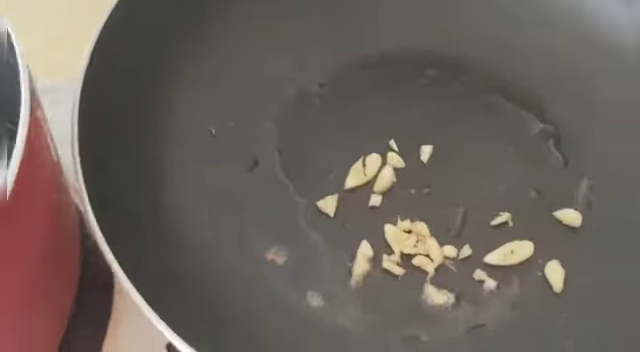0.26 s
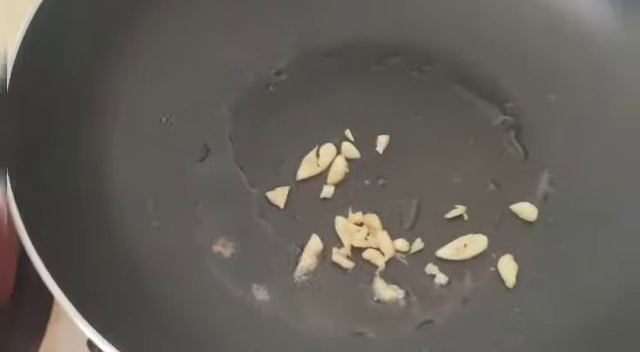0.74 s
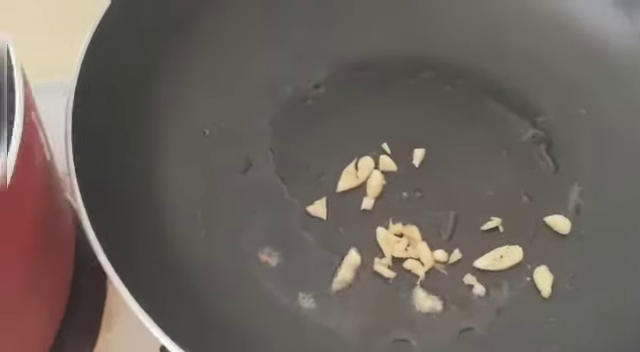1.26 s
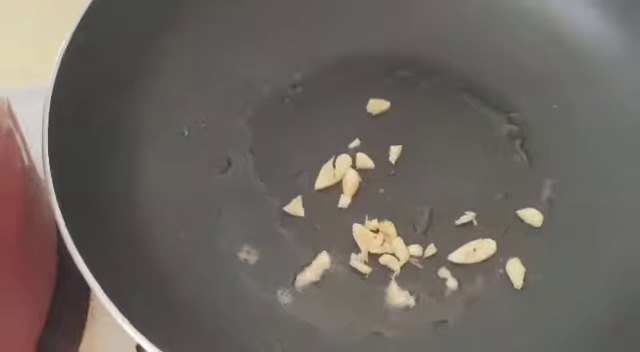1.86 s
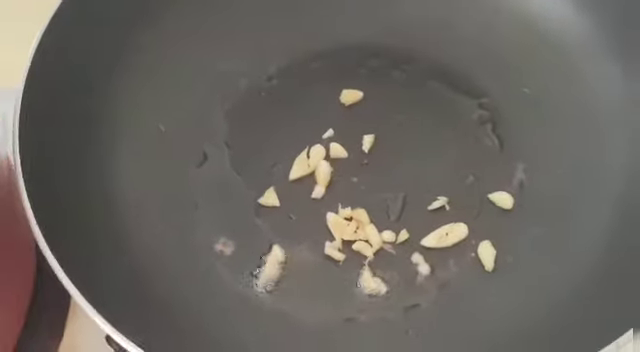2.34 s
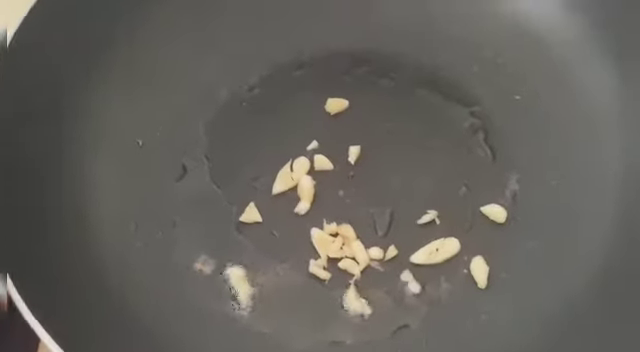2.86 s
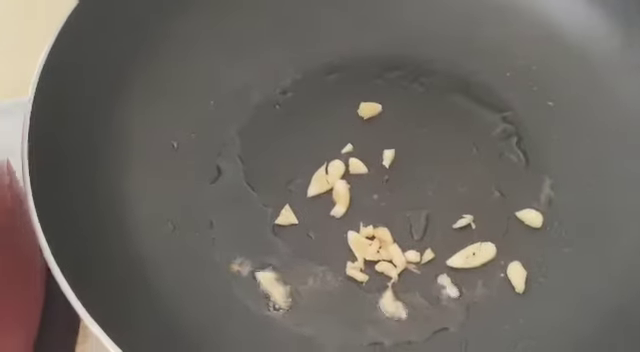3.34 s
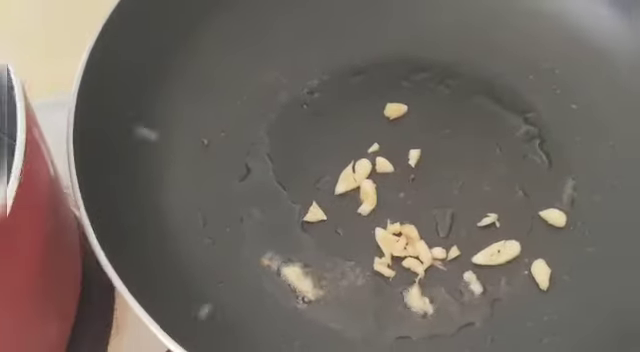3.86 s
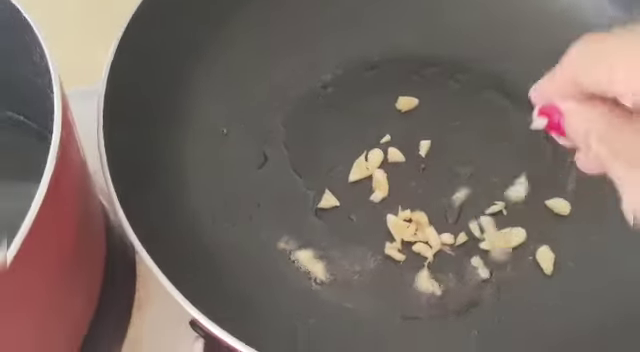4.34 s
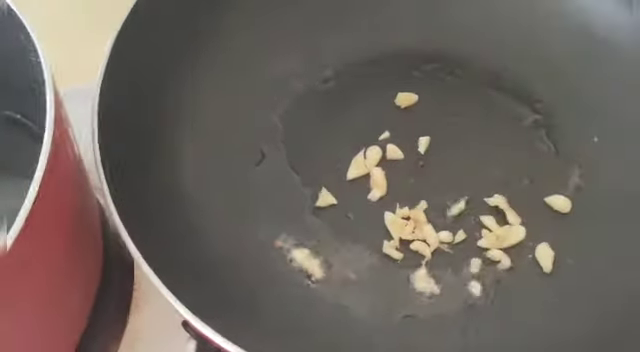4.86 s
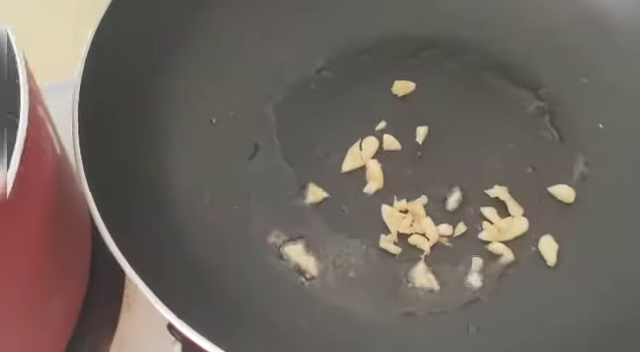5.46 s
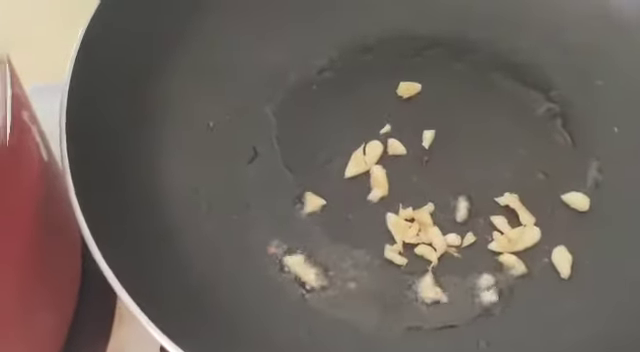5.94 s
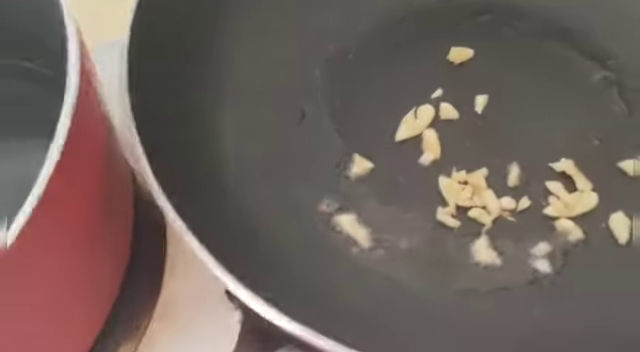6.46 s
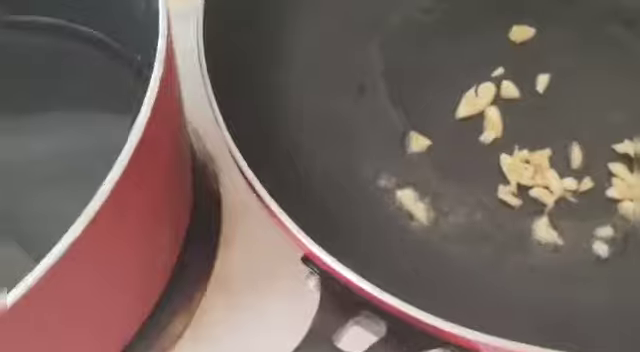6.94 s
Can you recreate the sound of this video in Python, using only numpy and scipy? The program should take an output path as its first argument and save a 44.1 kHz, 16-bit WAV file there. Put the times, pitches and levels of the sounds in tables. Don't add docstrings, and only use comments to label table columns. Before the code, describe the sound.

A steady, fine sizzle of garlic in hot oil fills about 7 seconds, thin and bright, strongest around 8 kHz, over quiet room rumble and burner and fridge hum. A faint handling thud opens it; the first second and a half is mostly even hiss with small chirping bubbles. At 1.5 s a piece lands with a soft, dull knock and tiny bounces; a pop snaps at 1.9 s. From 2.7 to 3.3 s squeaky bubbles and crisp pops cluster. A lower, spattering pop comes at 3.8 s, more crackles at 4.15-4.25 s, and two close knocks at 4.4 s. The sizzle rises slightly near 4.8 s. Strong sharp pops hit at 5.15, 5.4 and 5.7 s, a lesser one with a faint bump at 6.2 s, and another strong pop at 7.0 s. Close, stereo, handheld phone, with slightly watery noise-reduced treble.

```python
import sys
import numpy as np
from scipy import signal
from scipy.io import wavfile
from scipy.ndimage import uniform_filter1d, minimum_filter1d

SR = 44100
rng = np.random.default_rng(int(sys.argv[2]) if len(sys.argv) > 2 else 0)


def output_pcm(signal):
    pcm = np.clip(np.atleast_2d(signal).T, -1, 1) * 32767
    wavfile.write(sys.argv[1], SR, np.round(pcm).astype(np.int16))


def voltage_ratio(level):
    return 10 ** (np.asarray(level, float) / 20)


N = 317079
STEP = 40

# frequency in Hz, level in dB per Hz.
ROOM_SPECTRUM = [(12, -30), (20, -9), (31, -20), (49, -12.5), (156, -12.5), (558, -17), (738, -18),
                 (917, -20.5), (1190, -4.5), (1410, -21), (2000, -17), (2420, -18), (3500, -28.5),
                 (4550, -96), (7700, -120)]
# frequency in Hz, width in Hz, level in dB.
HUMS = [
    (78.6, 4.3, -69),
    (142.6, 6.7, -65),
    (690, 170, -73),
]
# start in seconds, peak in dB.
BUMPS = [
    (0.02, -47),
    (0.471, -49),
    (6.219, -45),
]
# start in seconds, peak in dB, pitch in Hz.
KNOCKS = [
    (1.287, -40, 667),
    (1.5068, -27, 730),
    (1.528, -40, 775),
    (1.545, -40, 790),
    (2.015, -51, 785),
    (4.3975, -34.5, 790),
    (4.431, -34, 780),
    (4.749, -46, 690),
]
# start in seconds, peak in dB, left-right in dB.
SNAPS = [(1.5025, -30, -6), (1.8645, -31, -6), (2.8489, -23, -4.0), (3.0579, -16, -1.5), (3.8113, -20, -8),
         (4.15, -16, -8), (4.2015, -23, -2.5), (4.4095, -24, -2), (5.9025, -38, 15), (6.1325, -20.5, -11),
         (6.2219, -16, -5.5), (6.5316, -26, -8.5), (6.9971, -17, -8), (7.0645, -19, -8.0)]
# start in seconds, level in dB, pitch in Hz, left-right in dB.
BLIPS = [(0.7423, -27, 8000, -1.8), (1.8728, -32, 8610, 0.1), (1.8664, -35, 7700, 0),
         (1.8714, -31, 7900, 0), (1.8795, -30, 7300, 0), (1.8895, -44, 8250, 0), (4.2297, -30.5, 4380, 0),
         (4.3965, -33, 1270, 6), (3.8125, -27, 7200, 0), (3.8258, -33, 4480, 0), (3.8122, -29, 3000, -2),
         (2.6599, -27, 7760, -2.0), (2.6796, -24, 8070, 2), (2.7443, -25, 8000, -0.3),
         (2.7813, -22, 6930, 1.7), (2.8367, -26, 6930, -1.5), (3.4817, -37, 7730, -20),
         (3.6746, -31, 8660, -2.5), (3.6821, -31.5, 7950, -4.7), (3.6874, -27, 8070, -1.4),
         (4.0297, -31, 9240, -7), (4.2349, -24, 4330, -3.6), (4.2399, -34, 4570, 1),
         (4.2482, -35, 4360, -3.2), (4.575, -33, 5400, 3), (4.768, -26, 7060, 2), (4.9856, -28, 8230, -8),
         (5.1675, -29.0, 8460, -2.7), (5.617, -30.1, 8050, -1.1), (5.7332, -28.0, 8200, -3.9),
         (5.7397, -26, 8300, -1.4), (5.7443, -24.5, 4220, -5), (5.8649, -39, 8600, -3.0),
         (6.11, -25, 8500, -0.9), (6.2123, -30.5, 8290, 3), (6.2289, -30.9, 8050, 4.2),
         (6.4148, -27, 7400, -9), (7.0309, -26.2, 8100, -3.3), (7.031, -31, 4400, 0),
         (4.2128, -29, 4400, 2), (5.4575, -27, 8000, 0), (5.4615, -28, 8050, 0), (5.4645, -27, 8100, 0)]
# start in seconds, level in dB, pitch in Hz.
MIDDLE_BLIPS = [(0.249, -27, 8700), (0.304, -26, 7860), (0.7497, -31, 7760), (0.8544, -31, 8180),
                (0.9517, -29, 8100), (1.1299, -29, 8050), (1.1438, -34, 7900), (1.5033, -29, 8700),
                (1.5948, -31, 7970), (1.6123, -31, 8290), (1.6177, -30, 7900), (1.7625, -26.5, 5800),
                (1.8262, -31, 8290), (2.0193, -35, 7800), (2.4364, -58, 8060), (2.7016, -26, 8230),
                (2.7495, -26, 8100), (2.766, -30, 7840), (2.7714, -28, 6750), (2.8522, -29, 7900),
                (2.8567, -26, 8050), (3.3307, -31, 7200), (3.3371, -30, 8310), (3.3506, -26, 8500),
                (3.4882, -30, 7430), (3.6688, -30, 7600), (3.8478, -36, 7880), (3.9052, -43, 8200),
                (4.0381, -31, 7390), (4.135, -32, 7450), (4.4322, -36, 10030), (4.4401, -31, 9900),
                (4.8186, -32, 7500), (4.9917, -31, 8400), (5.0015, -26.5, 6800), (5.0778, -33, 7600),
                (5.135, -33, 8570), (5.2881, -27, 7700), (5.299, -29, 7700), (5.3159, -30, 5200),
                (5.4531, -23, 7820), (5.5196, -29, 7150), (5.5719, -26, 7210), (5.5959, -31, 8200),
                (5.6007, -28, 7990), (5.7006, -31, 7800), (5.7083, -31, 8760), (5.7142, -26, 8720),
                (5.7191, -30, 8040), (5.7256, -31, 7970), (5.8256, -27, 8320), (5.9044, -34, 7080),
                (6.0458, -50, 9070), (6.0663, -24, 8850), (6.1171, -32, 8510), (6.3557, -30, 7300),
                (6.3641, -34, 7600), (6.6183, -31, 7920), (6.7983, -30, 7920), (6.9141, -32, 7990)]
# start in seconds, peak in dB, pitch in Hz, left-right in dB.
SQUEALS = [(0.7494, -26.5, 8000, 2), (2.682, -29.5, 7040, 0), (2.748, -25, 7700, 0), (2.765, -29, 7000, 2),
           (2.828, -24.5, 6900, 0), (2.849, -31, 8200, 0), (1.82, -29, 8300, -3), (3.672, -27, 8460, 2),
           (3.845, -30, 7340, -1), (4.025, -35, 9500, -9), (4.572, -29, 5300, 3), (5.16, -26, 8300, 0),
           (5.3094, -29, 5550, 1), (5.455, -19, 8070, 0), (5.698, -32, 7940, 0), (5.702, -29, 6000, -3),
           (5.724, -24, 6800, 0), (5.5179, -30, 7160, -2.0), (7.028, -30, 6000, -3.5),
           (7.0294, -28, 8060, 4), (7.055, -26, 6800, 0), (7.036, -31, 8200, 0), (2.752, -32, 8200, 0),
           (2.962, -28, 7900, 0), (3.003, -25, 7950, 0), (2.875, -29, 7500, 0)]
# start in seconds, peak in dB, pitch in Hz, left-right in dB.
SPATTERS = [(1.735, -33, 5870, -2), (1.866, -27, 8200, -3), (3.809, -30, 3130, -2), (3.815, -33, 4500, -4),
            (4.21, -28.5, 3760, 3), (4.224, -28.5, 4470, -5), (4.245, -39, 4200, 2), (4.235, -31, 6000, 0),
            (4.262, -34, 3870, 0), (5.705, -36, 5070, -5), (5.735, -32, 4350, -2.5), (7.026, -34, 4450, 0)]
# start in seconds, peak in dB, pitch in Hz, relative lows in dB, left-right in dB.
POPS = [(1.8635, -16.5, 8640, -17.5, 4), (2.4903, -35.5, 8200, -1.5, 0), (2.867, -23, 7400, -26, 2),
        (2.96, -17, 8300, -38, -0.5), (2.995, -22, 7800, -17, -1.5), (3.0568, -16, 8700, -24, -2),
        (3.3248, -18.5, 7460, -41, 1), (3.8098, -17, 2770, -15.5, 7), (4.15, -24.5, 7460, -17, 5),
        (4.2008, -18, 7800, -26, 3), (4.2263, -17, 4270, -30, 9), (4.4087, -30.5, 8400, -7, -4),
        (5.1433, -11.5, 7940, -21.5, 1), (5.19, -19.5, 7570, -22, 2), (5.263, -35, 8100, -6.5, -2),
        (5.4016, -13.5, 6850, -47, -7), (5.5586, -19, 7500, -34, 1), (0.2427, -25, 8300, -30, 14),
        (5.6908, -11.5, 7450, -19.5, -1), (5.949, -26, 3600, -14, 5), (6.221, -20, 7900, -16, 6),
        (6.996, -12.5, 7800, -15.5, 0.5), (7.064, -27, 6700, -26, -3.5), (7.114, -28, 6870, -16.5, -3),
        (1.5015, -33, 8600, -5.5, 0)]
# lag in seconds, level in dB.
PAN_ECHOES = [(.0009, -11), (.0017, -11), (.0026, -13), (.0038, -16)]
# relative lows in dB, lower edge in Hz.
LOWS_REACH = [(-18, 2700), (-15, 750)]
# frequency in Hz, level in dB per Hz.
FIZZ_SPECTRUM = [(1180, -39), (2000, -20), (2400, -19.5), (3020, -12), (4450, -9), (4890, -8), (5810, -5),
                 (7070, 0.5), (8050, 3.5), (9000, -0.5), (11300, -6.5), (13100, -9), (15100, -4.5),
                 (15600, -12)]
# time in seconds, level in dB.
VIGOUR = [(0.0, -35.5), (0.58, -38.5), (0.9, -38), (1.2, -39), (1.58, -39), (2.3, -39), (2.68, -38),
          (2.88, -38.5), (3.04, -36), (3.36, -40.5), (4.14, -41), (4.46, -40.5), (4.83, -36.5), (5.29, -37),
          (5.6, -38.5), (6.27, -37.5), (6.57, -36.5), (7.19, -39)]
# time in seconds, treble in dB, lows in dB, left-right in dB.
AIM = [
    (0.0, 4, 4.5, -3),
    (1.2, 3, 2.4, -1),
    (2.8, 2.1, 1, -1),
    (4.2, -1.5, 0.5, -1.8),
    (5.3, 0, 3.5, -1.5),
    (7.19, 0.9, 2, -3.5),
]
# frequency in Hz, width in Hz, gain in dB.
WALL_NOTCHES = [(4480, 130, 2.5), (4950, 300, -3), (6270, 260, -2.2), (6930, 130, -5.5), (8730, 140, -3),
                (8930, 130, -4), (9650, 200, -2), (10450, 150, -2), (11100, 200, -1.5), (11900, 130, -1.2),
                (13000, 140, -2), (13560, 130, -1.5), (8100, 200, 1.3), (15650, 500, 3)]
# frequency in Hz, left-right correlation (no unit).
LIKENESS = [(30, 0.8), (60, 1), (110, 0.86), (170, 0.99), (380, 0.59), (700, 0.36), (1200, -0.15),
            (2380, 0.51), (5980, -0.18), (15000, 0.11)]
# frequency in Hz, stretch of narrow peaks and dips
# in dB per dB.
STRETCH = [(300, .05), (700, .2), (1400, .55), (3800, .4), (4900, 1.15), (7000, 1.4), (13300, 1.4),
           (14800, .6)]


def rms_one(x):
    return x / np.sqrt(np.mean(x ** 2) + 1e-20)


def at_hz(points, hz):
    table_hz, values = np.array(points)[:, :2].T
    return np.interp(np.log(hz), np.log(table_hz), values)


def curves(rows):
    s, *columns = np.transpose(rows)
    step_s = np.arange(N // STEP + 2) * STEP / SR
    return [np.interp(step_s, s, column) for column in columns]


def swell(db):
    return np.interp(np.arange(N) / STEP, np.arange(len(db)), voltage_ratio(db))


def drift(rate_hz):
    r = np.exp(-2 * np.pi * rate_hz * STEP / SR)
    noise = rng.standard_normal(N // STEP + 2002)
    return rms_one(signal.lfilter([1], [1, -2 * r, r * r], noise)[2000:])


def resonance(x, hz, width_hz):
    r = np.exp(-np.pi * width_hz / SR)
    b = (1 - r * r) / 2 * np.array([1, 0, -1])
    a = [1, -2 * r * np.cos(2 * np.pi * hz / SR), r * r]
    return signal.lfilter(b, a, x + 1e-18)


def resonance_twice(x, hz, width_hz):
    return resonance(resonance(x, hz, width_hz), hz, width_hz)


def band_pass(x, order, low_hz, high_hz):
    sos = signal.butter(order, [low_hz, high_hz], "band", fs=SR, output="sos")
    return signal.sosfilt(sos, x)


def peak(x, hz, width_hz, db):
    return x + (voltage_ratio(db) - 1) * resonance(x, hz, width_hz)


def stereo(pair, hz):
    alike = np.clip(at_hz(LIKENESS, hz), -.9, .98)
    return np.sqrt(1 + alike) * pair[0] + np.sqrt(1 - alike) * pair[1] * [[1], [-1]]


def add(out, s, sound, pan_db):
    at = round(s * SR)
    part = out[:, at:at + sound.shape[-1]]
    part += (sound * voltage_ratio(np.array([[.5], [-.5]]) * pan_db))[:, :part.shape[1]]


def canvas(length):
    return np.zeros((2, N)), np.arange(length) / SR


def room(level_db):
    rumble, flame = swell(-0.4 * drift(3.1)), swell(0.73 * drift(10.0))
    white = rng.standard_normal((2, 2, N))
    edges_hz = 18 * 2 ** (np.arange(17) / 2)
    air = 0
    for k, (low_hz, high_hz) in enumerate(zip(edges_hz, edges_hz[1:])):
        band = band_pass(white[k % 2], 2, low_hz, high_hz)
        hz = np.sqrt(low_hz * high_hz)
        air = air + voltage_ratio(at_hz(ROOM_SPECTRUM, hz)) * stereo(band, hz) * (rumble if hz < 220 else flame)
    hum = 0
    for hz, width_hz, db in HUMS:
        hum = hum + voltage_ratio(db) * rms_one(stereo(resonance_twice(white[0], hz, width_hz), hz))
    return voltage_ratio(level_db) * rms_one(air) + hum * rumble


def bumps(boost_db, hz, rise_s):
    out, t = canvas(SR // 4)
    shape = t / rise_s * np.exp(1 - t / rise_s)
    for s, peak_db in BUMPS:
        thud = rms_one(resonance(rng.standard_normal(len(t)), hz, hz))
        add(out, s, voltage_ratio(peak_db + boost_db) * shape * thud, 0)
    return out


def knocks(t60_s, rise_s, boost_db):
    out, t = canvas(SR // 10)
    shape = voltage_ratio(-60 * t / t60_s) * (1 - np.exp(-t / rise_s))
    for s, peak_db, hz in KNOCKS:
        note = np.sin(2 * np.pi * hz * t) + 0.5 * np.sin(2 * np.pi * 0.84 * hz * t)
        overtone = .9 * resonance(rng.standard_normal((2, len(t))), 1250, 500)
        add(out, s - .002, voltage_ratio(peak_db + boost_db) * shape * (note + overtone), 0)
    return out


def snaps(boost_db, hz, width_hz, t60_s):
    out, t = canvas(SR // 50)
    for s, peak_db, pan_db in SNAPS:
        burst = voltage_ratio(-60 * t / t60_s) * rng.standard_normal((2, len(t)))
        tick = resonance_twice(burst, hz, width_hz)
        add(out, s, voltage_ratio(peak_db + boost_db) * tick / np.abs(tick).max(), pan_db + 6.5)
    return out


def blips(table, boost_db, rise_s=0.00037, t60_s=0.0068, glide=0.021):
    out, t = canvas(SR // 50)
    shape = (1 - np.exp(-(t / rise_s) ** 2)) * voltage_ratio(-60 * t / t60_s)
    bend = 1 + glide * (t / t60_s - .3)
    phases = rng.normal(0, 0.7, (len(table), 2, 1))
    for (s, level_db, hz, pan_db), phase in zip(table, phases):
        tone = np.sin(2 * np.pi * hz * t * bend + phase)
        add(out, s - .001, voltage_ratio(level_db + boost_db) * shape * tone, pan_db)
    return out


def leaks(table, boost_db, length_s, width_share):
    out, t = canvas(SR // 6)
    shape = (t / length_s * np.exp(1 - t / length_s * 1.28)) ** 0.98 * 0.98
    for s, peak_db, hz, pan_db in table:
        grain_db = 2.6 * np.minimum(rng.exponential(1, len(t)), 4.0)
        noise = rng.standard_normal((2, len(t))) * voltage_ratio(grain_db)
        tone = resonance_twice(noise, hz, width_share * hz)
        add(out, s - .002, voltage_ratio(peak_db + boost_db) * shape * rms_one(tone), pan_db)
    return out


def pop_click(t, spit_db, spit_t60_s):
    start = 50
    click = np.zeros((2, len(t)))
    click[:, start] = 1
    for lag_s, echo_db in PAN_ECHOES:
        lag = (lag_s * SR * rng.uniform(.9, 1.1, 2)).astype(int)
        click[[0, 1], start + lag] = voltage_ratio(echo_db) * rng.choice([-1, 1], 2)
    spit = voltage_ratio(spit_db - 60 * t / spit_t60_s) * rng.standard_normal(click.shape)
    return click + spit * (t > start / SR)


def pops(spit_db, spit_t60_s, ring_width_hz, after_width_hz, after_db):
    out, t = canvas(SR // 10)
    for s, peak_db, hz, lows_db, pan_db in POPS:
        click = pop_click(t, spit_db, spit_t60_s)
        ring = resonance_twice(click, hz, ring_width_hz)
        after = resonance(click, hz, after_width_hz)
        ring = ring / np.abs(ring).max() + voltage_ratio(after_db) * after / np.abs(after).max()
        low_edge_hz = np.interp(lows_db, *np.transpose(LOWS_REACH))
        lows = voltage_ratio(lows_db + 25.5) * band_pass(click, 3, low_edge_hz, 5300)
        highs_db = -23 + 1.8 * (peak_db + 17) - 3 * np.log2(hz / 8000) + 0.34 * (lows_db + 20)
        highs = voltage_ratio(highs_db + 10.0) * resonance_twice(click, 15000, 5500)
        pop = ring / np.abs(ring).max() + np.sign(4000 - hz) * lows - highs
        add(out, s, voltage_ratio(peak_db) * pop, pan_db)
    return out


def sizzle(per_s, uneven_db, patchy_db, flutter_db, big_follows, mist_follows):
    (level_db,), (treble_db, lows_db, pan_db) = curves(VIGOUR), curves(AIM)
    swing_db = level_db - level_db.mean()
    big_db = lows_db - (1 - big_follows) * swing_db
    mist_db = treble_db - (1 - mist_follows) * swing_db
    sizes = voltage_ratio(uneven_db * np.minimum(rng.exponential(1, (2, N)), 5)) * rng.standard_normal((2, N))
    bursts = sizes * (rng.random((2, N)) < per_s / SR) * swell(flutter_db * drift(25))
    dealt = rng.integers(0, 4, (2, N))
    hands = [bursts * (dealt == k) for k in range(4)]
    out, near = 0, drift(2.2)
    for k, hz in enumerate(np.geomspace(2100, 16300, num=28)):
        near = .8 * near + .6 * drift(14)
        rings = resonance_twice(hands[k % 4], hz, hz / 8)
        octaves = np.log2(hz / 7500)
        tilt_db = big_db * np.clip(-octaves / .5, 0, 1) + mist_db * np.clip(octaves / 0.61, 0, 1)
        out = out + swell(at_hz(FIZZ_SPECTRUM, hz) + tilt_db + patchy_db * near) * stereo(rings, hz)
    return rms_one(out) * [swell(level_db + 4.5 + pan_db / 2), swell(level_db + 3.0 - pan_db / 2)]


def scene():
    out = room(level_db=-49)
    out = out + bumps(boost_db=-7.0, hz=87, rise_s=0.016)
    out = out + knocks(t60_s=0.021, rise_s=0.0045, boost_db=7.5)
    out = out + snaps(boost_db=0.5, hz=12200, width_hz=8800, t60_s=0.0062)
    out = out + blips([(*row, -1.5) for row in MIDDLE_BLIPS], boost_db=7.0)
    out = out + blips(BLIPS, boost_db=6.0)
    out = out + leaks(SPATTERS, boost_db=-6.5, length_s=0.016, width_share=0.21)
    out = out + leaks(SQUEALS, boost_db=-7.0, length_s=.01, width_share=0.081)
    out = out + pops(spit_db=-19.0, spit_t60_s=0.023, ring_width_hz=2200, after_width_hz=900, after_db=1)
    frying = sizzle(per_s=22000, uneven_db=0.5, patchy_db=1.0, flutter_db=-0.7,
                    big_follows=0.067, mist_follows=0.31)
    for notch in WALL_NOTCHES:
        frying = peak(frying, *notch)
    return out + frying


def stretch_bands(x, top_hz, above_top_db, gate_db, gate_depth_db, patches_db):
    hz, s, cells = signal.stft(x, SR, nperseg=2048, noverlap=1536)
    power = np.sum(np.abs(cells) ** 2, axis=0) + 1e-18
    narrow = uniform_filter1d(uniform_filter1d(power, size=2, axis=0), size=4, axis=1)
    patches = rng.standard_normal(power.shape)
    for _ in range(2):
        patches = uniform_filter1d(uniform_filter1d(patches, size=9, axis=0), size=3, axis=1)
    contrast_db = 10 * np.log10(narrow / uniform_filter1d(narrow, size=41, axis=0))
    contrast_db = contrast_db + patches_db * rms_one(patches)

    energy = np.sum(x ** 2, axis=0)
    loudest = -minimum_filter1d(-energy, size=1400)
    crest_db = 10 * np.log10(loudest / uniform_filter1d(energy, size=4000) + 1e-9)
    crest_db = crest_db[np.minimum((s * SR).astype(int), N - 1)]
    steady = np.clip((19 - crest_db) / 3, 0, 1)

    stretch = at_hz(STRETCH, hz + 1)[:, None] * steady
    gate = gate_depth_db / (0.5 + np.exp(2 * (contrast_db - gate_db)))
    gain = voltage_ratio(stretch * (contrast_db + gate))
    before = uniform_filter1d(power, size=41, axis=0)
    after = uniform_filter1d(power * gain ** 2, size=41, axis=0)
    gain = gain * np.sqrt(before / after)
    spill = voltage_ratio(above_top_db * np.clip((25 - crest_db) / 4, .3, 1))
    gain = gain * np.where(hz[:, None] > top_hz, spill, 1)
    return signal.istft(cells * gain, SR, nperseg=2048, noverlap=1536)[1][:, :N]


def band_limit(x):
    return signal.sosfilt(signal.butter(12, 17030, fs=SR, output="sos"), x)


def record(dry):
    left = peak(dry[0], hz=15500, width_hz=2400, db=-18)
    right = peak(dry[1], hz=15500, width_hz=3800, db=4.7)
    shaped = stretch_bands(np.array([left, right]), top_hz=15755, above_top_db=-80,
                    gate_db=-4.5, gate_depth_db=-25, patches_db=3.8)
    return band_limit(shaped + .0028)


dry = scene()
out = record(dry)
output_pcm(out)
```